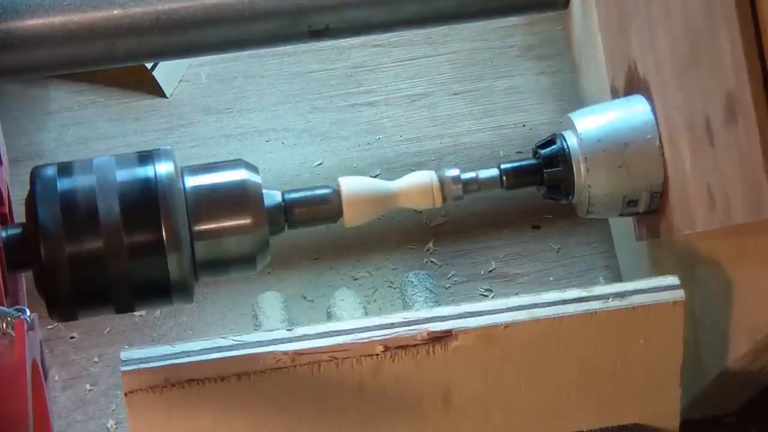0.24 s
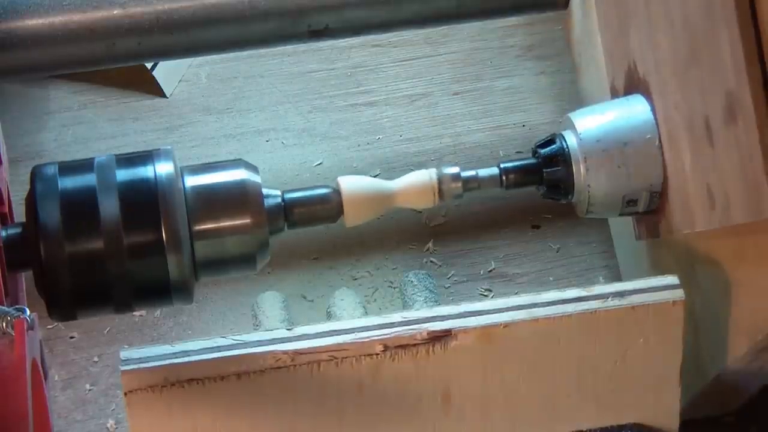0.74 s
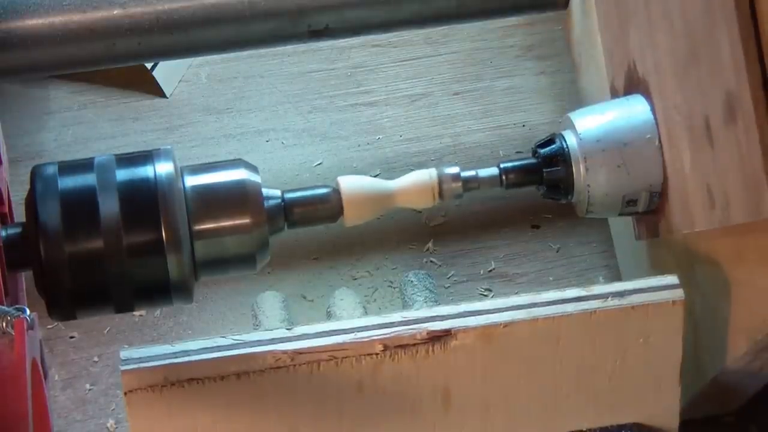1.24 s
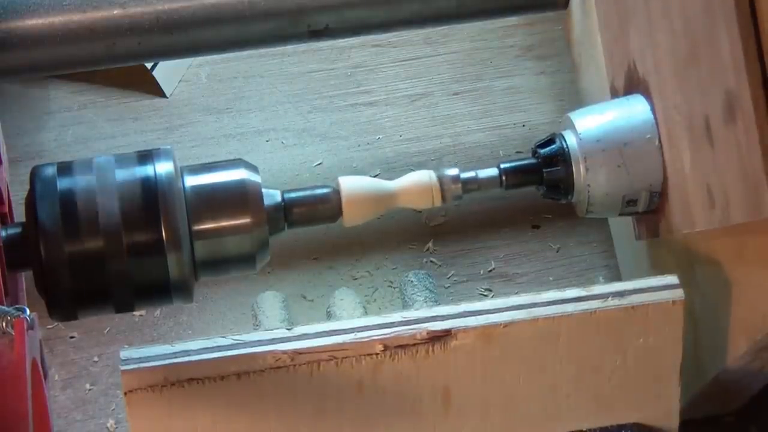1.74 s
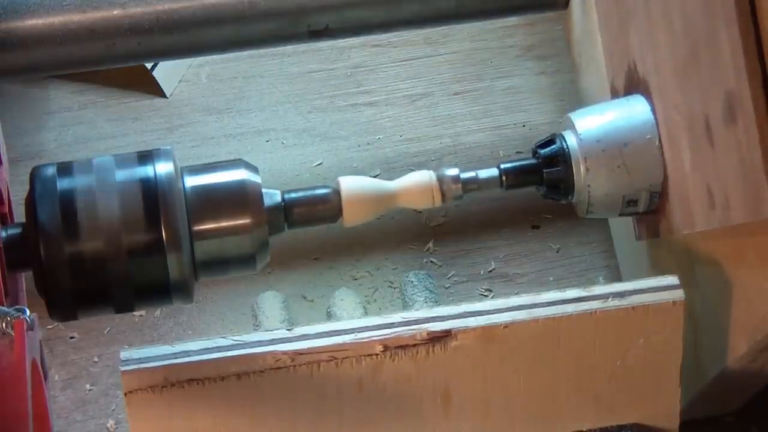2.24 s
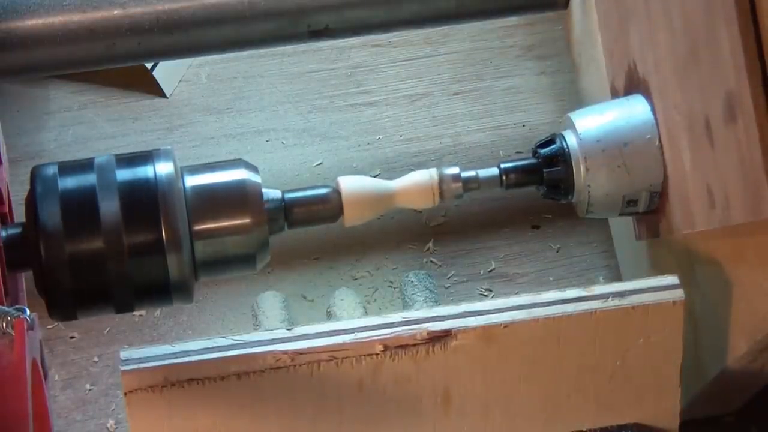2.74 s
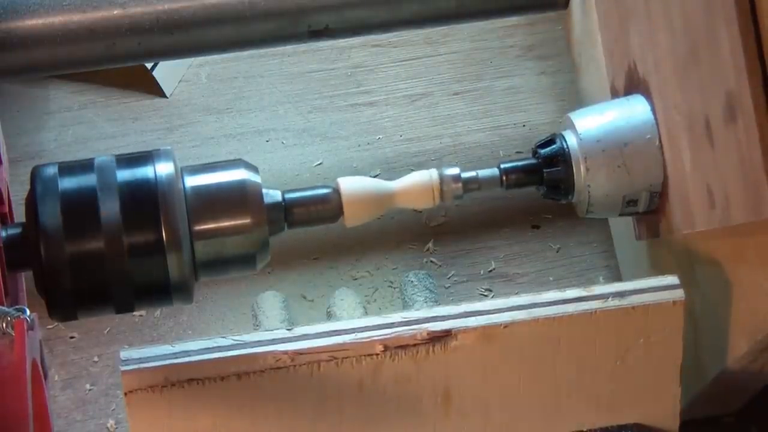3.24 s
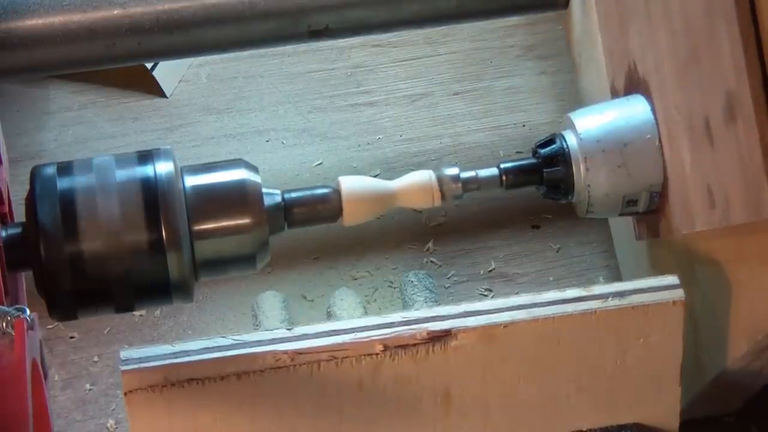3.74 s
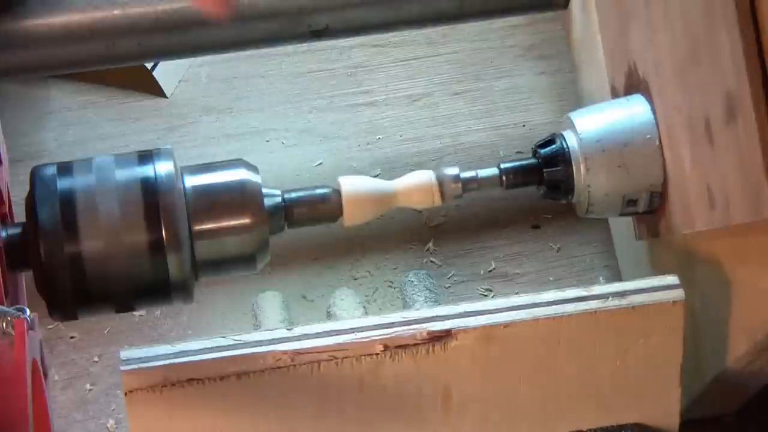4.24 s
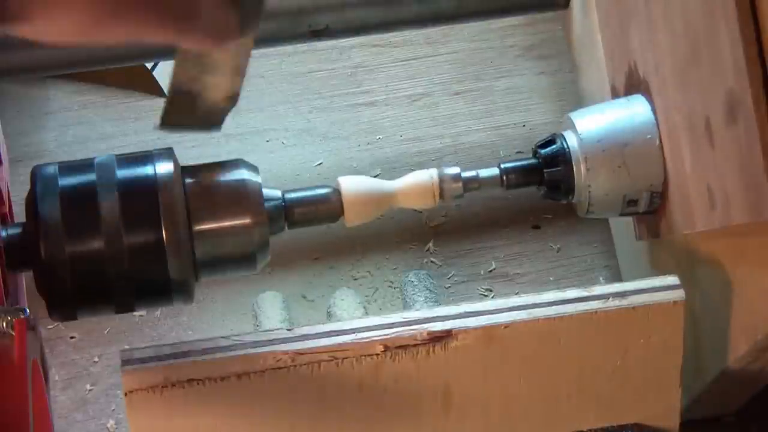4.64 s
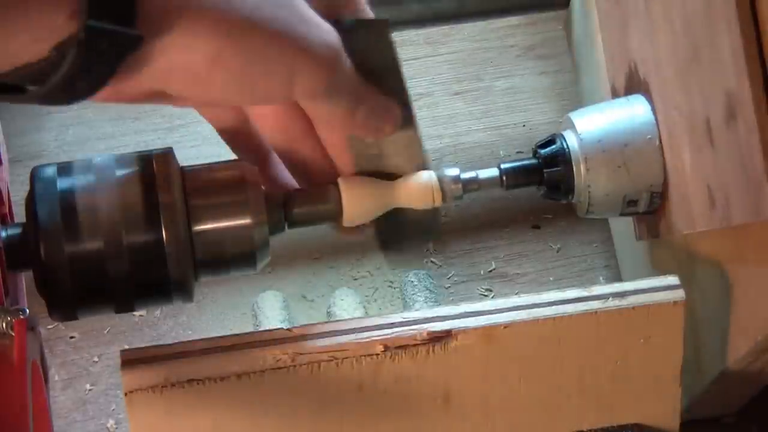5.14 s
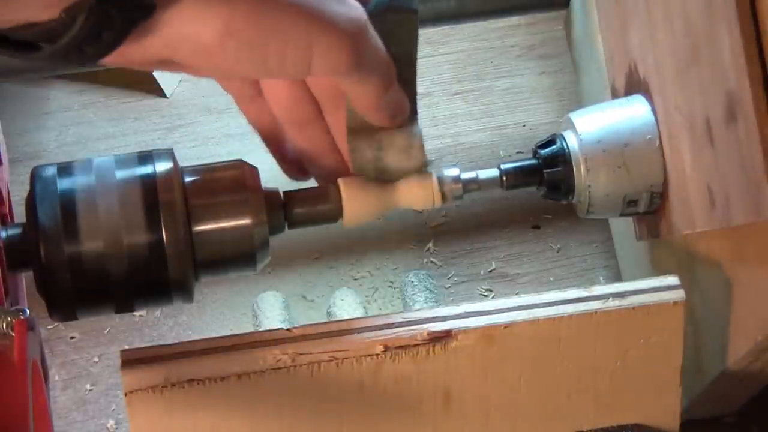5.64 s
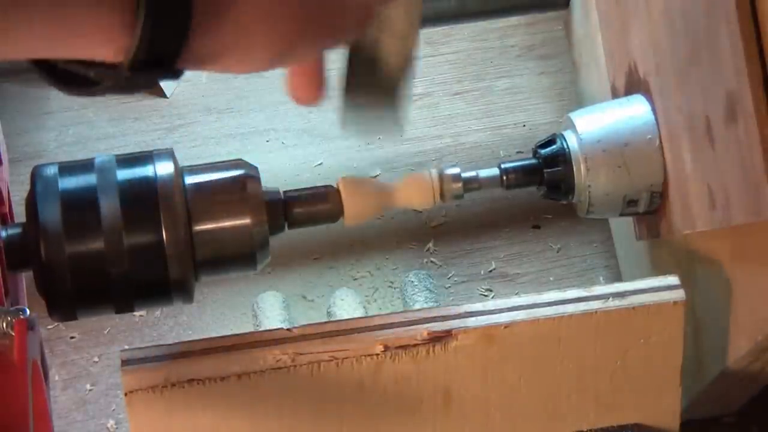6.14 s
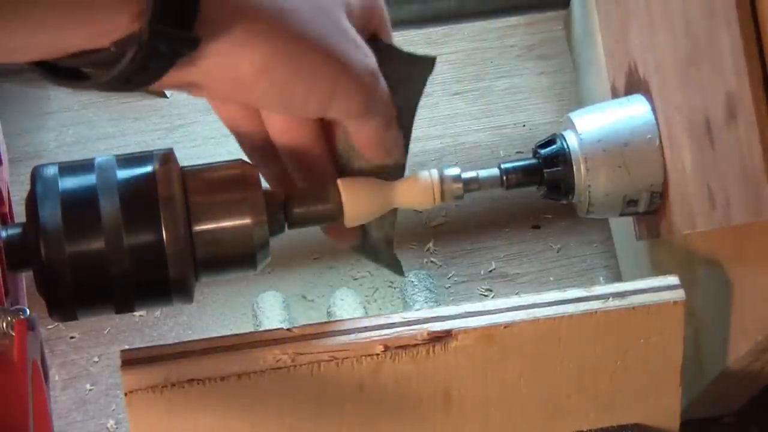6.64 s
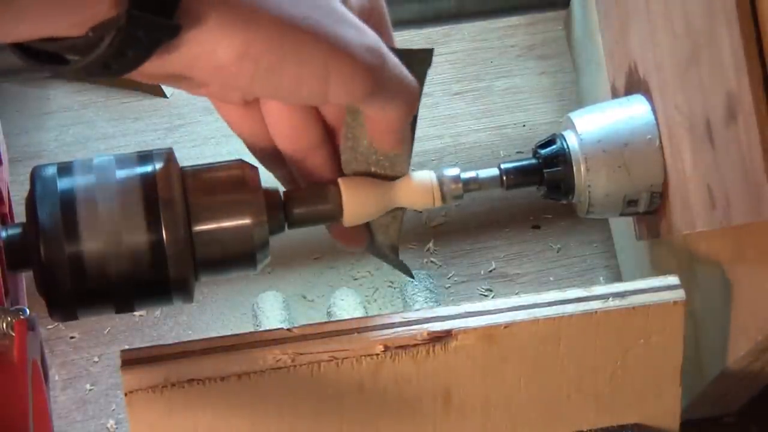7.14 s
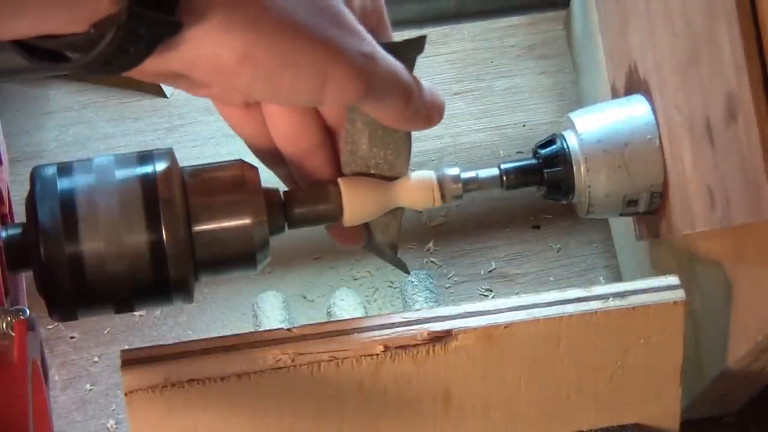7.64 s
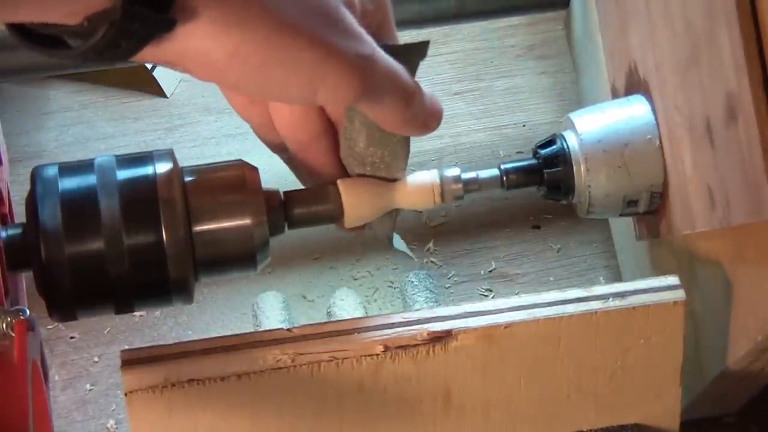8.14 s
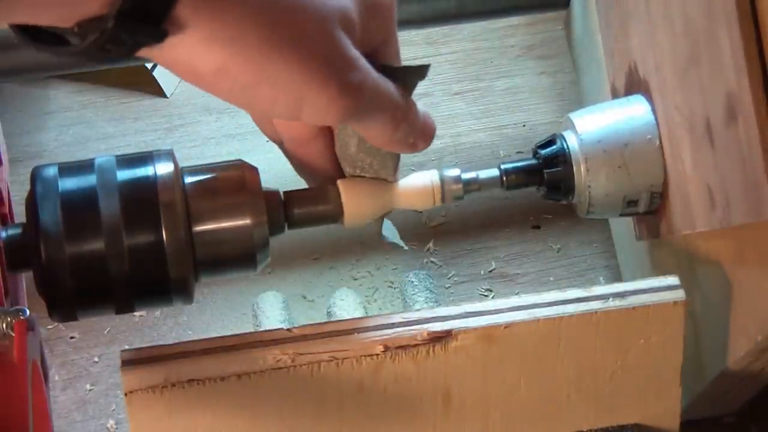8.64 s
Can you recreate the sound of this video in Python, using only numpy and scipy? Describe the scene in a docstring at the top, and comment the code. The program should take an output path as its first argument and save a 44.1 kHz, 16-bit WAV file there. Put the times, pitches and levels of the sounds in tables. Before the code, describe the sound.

A drill press is already running at 0 seconds, close ahead in a small shed: a strong low mains hum throbs rapidly with the motor shaft, over belt rumble, faint steady whines and a light bearing rattle with occasional tiny jolts. It continues throughout. Around 2.2 seconds stiff abrasive paper begins to slide and crinkle in the fingers, with small dry snaps near 2.8, 3.3, 3.6, 4.25 and 4.5. At about 5.4 the paper touches the spinning wooden dowel, giving a bright, rough hiss for roughly half a second, then lifts at 5.85. Faint paper rustles follow around 6.1 to 6.3. From 7.0 the paper is pressed on; a gritty high hiss swells and holds to the end near 8.9, fluttering with rotation. The drive grows quieter under load, especially around 8.5, when a thin papery ringing becomes stronger. Nearby boards add very short reflections.

```python
"""A drill press is already running in a shed, close ahead of the microphones: mains hum that throbs with the
motor shaft, a belt rumbling through the frame and a light rattle of bearings, made of tones and shaped noise.
A strip of abrasive paper then slides and crinkles in the fingers, as clumps of tiny ticks and ringing modes.
It touches the spinning wooden dowel once, then is pressed on: a rising hiss of grit, wavering with each turn,
lasts to the end while the load quiets the drive."""
import sys
import numpy as np
from scipy import signal
from scipy.fft import rfft, irfft
from scipy.io import wavfile

SR = 44100
rng = np.random.default_rng(int(sys.argv[2]) if len(sys.argv) > 2 else 0)


def wav_out(sig):
    """Save sig, one row per channel (or a flat mono array), as 16-bit PCM at SR to the path in sys.argv[1]."""
    wavfile.write(sys.argv[1], SR, np.round(np.clip(np.atleast_2d(sig).T, -1, 1) * 32767).astype(np.int16))


N = 392049
TIME, FREQ = np.arange(N) / SR, np.fft.rfftfreq(N, 1 / SR)  # s, Hz
HUM_HZ, SHAFT_HZ, BELT_HZ = 99.966, 24.82, 6.19  # hum, turns of the motor shaft, laps of the belt

# How alike the paper sounds at the left and right microphones. Each row: frequency in Hz, likeness (1 = same).
PAPER_LIKENESS = [(1000, .999), (4000, 1), (5000, 1), (5700, 0.65), (6500, 0.22), (7300, .7), (10500, 0.79)]


def amp(db):
    """Decibels to gain."""
    return 10 ** (np.asarray(db) / 20)


def unit(x):
    """Scales to an rms of 1."""
    return x / np.sqrt(np.mean(x ** 2) + 1e-20)


def read(points):
    """Reads a table of (Hz, value) along a log-frequency axis."""
    hz, value = np.transpose(points)
    return np.interp(np.log(FREQ + 1), np.log(hz + 1), value)


def over_time(points):
    """Reads a table of (s, value) along the scene in straight lines."""
    return np.interp(TIME, *np.transpose(points))


def lowpass(x, hz):
    """Smoothly removes what lies above hz."""
    return irfft(rfft(x) / (1 + (FREQ / hz) ** 4), N)


def wander(hz):
    """Slow chance of rms 1, up to about hz changes a second."""
    return unit(lowpass(rng.standard_normal(N), hz))


def turning(hz):
    """Angle of something that turns steadily, from a chance start."""
    return 2 * np.pi * (hz * TIME + rng.random())


def swells(rows):
    """Sum of smooth swells, each (middle s, height, half length s)."""
    return sum(height * np.exp(-((TIME - s) / length) ** 2) for s, height, length in rows)


def grit(per_s, spread_db, share):
    """Separate ticks of uneven size over a smooth wash of countless small ones; share is the ticks' power."""
    size_db = spread_db * np.minimum(rng.exponential(1, N), 4)
    size = amp(size_db) * (rng.random(N) < per_s / SR)
    ticks = unit(size * rng.standard_normal((2, N)))
    wash = rng.standard_normal((2, N))
    share = np.clip(share, 0, 1)
    return np.sqrt(share) * ticks + np.sqrt(1 - share) * wash


def repeating(hz, share, fresh):
    """Mixes fresh chance with a pattern that comes round hz times a second; share is the pattern's power."""
    lap = rng.standard_normal((2, round(SR / hz)))
    pattern = lap[:, np.arange(N) % lap.shape[1]]
    share = np.clip(share, 0, 1)
    return np.sqrt(share) * pattern + np.sqrt(1 - share) * fresh


def colour(pair, gain, same):
    """Filters two unrelated signals into a left and right of the given likeness, their middle at rms 1."""
    likeness = np.clip(read(same), -1, 1)
    mid, side = rfft(pair) * gain * np.sqrt([1 + likeness, 1 - likeness])
    mid, side = irfft(mid, N), irfft(side, N)
    return np.array([mid + side, mid - side]) / np.std(mid)


def load_swing():
    """Swing of the drive's level in dB, as the hum swells and sinks with the load on the motor."""
    # Each row: time in seconds, swing in dB.
    swing = [(0, .2), (2.2, -1.8), (2.85, .6), (6.85, 0), (7.12, 2.0), (7.85, -.3), (8.0, -2.2),
             (8.52, -4.5), (8.89, -2.0)]
    return over_time(swing)


def motor():
    """The stator hums at twice the mains; the off-centre rotor adds sidebands that throb once a turn."""
    # Harmonics of the magnetic hum, lowest first. Each row: level in dB, sideband one shaft rate below in dB,
    # sideband above in dB, share of the load swing it follows.
    harmonics = [(-17, -57, -53, .45), (-17.5, -53, -58, 0.88), (-26.5, -50, -49, 1.7),
                 (-30.5, -44, -47, 1.1), (-17, -26, -35.5, 0.63), (-31.5, -40, -60, .3),
                 (-41, -55, -53, .3), (-40, -57, -57, .3), (-44, -47, -51, .3)]
    # Steady tones of pulleys, rotor slots and bearings. Each row: frequency in Hz, level in dB.
    whine_tones = [(54.1, -50), (127, -41), (181.2, -36.5), (254.1, -38), (327, -37), (354, -34.5),
                   (367.6, -46), (744.5, -50.5), (819.7, -38), (1144.4, -42.5), (1169, -48), (1244.3, -50),
                   (1271, -46), (1444.3, -48), (3391, -59), (4387, -61)]
    drift, jitter = 0.15, 0.022  # radians rms: shaft angle, hum phase
    belt_tug, waver = 0.067, 0.011  # depths of level change
    whine_feel = 0.61  # share of the load swing
    swing_db = load_swing()
    mains, belt = turning(HUM_HZ), turning(BELT_HZ)
    shaft = turning(SHAFT_HZ) + drift * wander(1.7)
    hum = np.zeros(N)
    for k, (db, below_db, above_db, feel) in enumerate(harmonics, 1):
        # bending waves disperse in the frame, which spreads each pulse out in time
        angle = k * mains - .58 * k * (k - 1) + jitter * wander(3.7)
        tone = amp(db) * np.cos(angle)
        tone = tone + amp(below_db) * np.cos(angle - shaft) + amp(above_db) * np.cos(angle + shaft)
        # the belt tugs once a lap, most on the higher harmonics
        unevenness = 1 + belt_tug * np.log(k) * np.cos(belt) + waver * wander(3.4)
        hum += tone * amp(feel * swing_db) * unevenness
    whine = np.zeros(N)
    for hz, db in whine_tones:
        tone = np.cos(turning(hz) + 0.29 * wander(2.1))
        whine += amp(db) * tone * (1 + 0.26 * wander(5))
    return np.sqrt(2) * (hum + amp(whine_feel * swing_db) * whine)  # levels are rms


def drive():
    """Belt and bearings shake the frame; the belt's bumps return on every lap, the bearings' on every turn."""
    # Spectra of belt and bearings before the frame. Each row: frequency in Hz, relative level in dB per Hz.
    rumble_colour = [(15, -22), (40, -14), (65, -15), (90, -8), (160, -11.5), (240, -9.5), (285, -3),
                     (370, -1), (420, -4.5), (510, -6.5), (545, -9.5), (750, -15.5), (1200, -33),
                     (3000, -65)]
    rattle_colour = [(200, -20), (560, -6), (750, 0.5), (1200, -3), (1500, -6.5), (1750, -8.5),
                     (2000, -11.5), (2700, -14), (3600, -19.5), (5000, -23.5), (7000, -28), (11000, -33)]
    # Resonances of the frame and belt guard. Each row: centre in Hz, width in Hz, lift (or dip) in dB.
    resonances = [(190, 20, 10.5), (265, 16, 4), (488, 29, 10), (616, 35, 6), (1120, 21, -3),
                  (1128, 41, 3.5), (2807, 120, 5), (2904, 100, -6.5), (3054, 73, 7), (4410, 94, 0),
                  (7300, 120, 4), (8430, 110, 6.5)]
    # Brief jolts in which the machine rattles harder. Each row: middle in seconds, lift in dB,
    # half length in seconds.
    jolts = [(.32, 2.5, .022), (.55, 2.5, .02), (2.838, 4.5, 0.028), (3.292, 5.5, 0.022),
             (3.57, 4.5, 0.015), (3.926, 5, .03), (5.573, 4, 0.018), (5.85, 3, .07), (6.005, 4, 0.02),
             (7.925, 3.5, 0.022), (8.155, 5.5, 0.018), (8.304, 4.5, .022), (8.67, 3.5, 0.03)]
    # Likeness of the drive at the two microphones. Each row: frequency in Hz, likeness (1 = same).
    drive_likeness = [(25, .94), (70, 1), (200, 1), (1000, .9998), (2000, 1), (4400, 1), (5200, .8),
                      (8000, 0.42), (11000, 0.71)]
    rumble_db, rattle_db = -20.1, -25.9  # before load, drift and jolts
    buzz, knock = 0.087, 0.061  # depths of chatter at the hum and shaft rates
    unsteady_db, clatter_db, clatter_hz = 0.9, 1.25, 1800
    # both follow the load a little and drift by chance
    swing_db = load_swing()
    rumble_gain = amp(rumble_db + .6 * swing_db + .3 * wander(2.5))
    rattle_gain = amp(rattle_db + .45 * swing_db + .15 * wander(2.5) + swells(jolts))
    frame = amp(sum(db / (1 + (2 * (FREQ - hz) / width) ** 2) for hz, width, db in resonances))
    belt = repeating(BELT_HZ, .22, rng.standard_normal((2, N))) * amp(1.6 * wander(15))
    # loose parts chatter at the rates of the hum and the shaft
    chatter = repeating(SHAFT_HZ, .16, grit(900, 1.6, 0.16)) * amp(unsteady_db * wander(18.5))
    chatter = chatter * (1 + buzz * np.cos(turning(HUM_HZ)) + knock * np.cos(turning(SHAFT_HZ)))
    # the heavier parts clatter in short bursts
    heavy = lowpass(chatter, clatter_hz)
    chatter = chatter + heavy * (amp(clatter_db * wander(10.5)) - 1)
    rumble = rumble_gain * colour(belt, frame * amp(read(rumble_colour)), drive_likeness)
    rattle = rattle_gain * colour(chatter, frame * amp(read(rattle_colour)), drive_likeness)
    return rumble + rattle


def ringing():
    """Grains drive the bending modes of the paper strip."""
    # Modes of the held paper. Each row: centre in Hz, width in Hz, relative level in dB.
    strip_modes = [(4990, 170, -4), (5330, 430, -9.5), (5700, 140, 2), (6080, 230, -2), (6650, 400, -6.5)]
    power = sum(amp(db) ** 2 / (1 + 2 * ((FREQ - hz) / width) ** 2) ** 2 for hz, width, db in strip_modes)
    return colour(grit(5000, 3., 0.32), np.sqrt(power), PAPER_LIKENESS)


def handling():
    """The paper slides and buckles in clumps of tiny snaps, each buckle also setting the strip ringing."""
    # The paper slides in the fingers. Each row: middle in seconds, level in dB, half length in seconds.
    slides = [(2.23, -42, .16), (2.82, -34.5, .07), (3.31, -38, .035), (3.58, -39.3, .13),
              (3.94, -42.5, .12), (4.265, -35, .045), (4.42, -37.5, .028), (4.58, -43.5, .09),
              (4.84, -34.5, .022), (6.09, -43, .14), (6.265, -37, .055)]
    # The stiff paper buckles or bites. Each row: peak in seconds, crackle level in dB,
    # level of the ringing strip in dB, decay in seconds.
    crinkles = [(2.215, -34, -33, .012), (2.34, -41, -35, .014), (2.824, -43, -46, .015),
                (3.117, -36, -41, 0.0134), (3.294, -29, -40, .014), (3.579, -28, -35, .013),
                (3.649, -37, -48, .015), (4.035, -36, -50, .02), (4.251, -35, -37, .024),
                (4.523, -41, -50, 0.016), (4.605, -42, -50, .012), (5.396, -32, -28.5, 0.045),
                (5.823, -31, -38, .012)]
    # Spectrum of the handled paper. Each row: frequency in Hz, relative level in dB per Hz.
    paper_colour = [(400, -13.5), (1400, -10), (2800, 3), (4500, 6), (6000, 1), (7500, -1), (11000, -5.5)]
    clump_db, rise_s = 1.5, 0.0024
    sliding = swells((s, amp(db), length) for s, db, length in slides)
    force = amp(clump_db * wander(40)) * sliding
    ring = np.zeros(N)
    for s, db, ring_db, decay in crinkles:
        snap = np.exp(-np.maximum((s - TIME) / rise_s, (TIME - s) / decay))
        force = force + amp(db) * snap
        ring = ring + amp(ring_db) * snap
    crackle = colour(grit(1500, 3.3, 0.26), amp(read(paper_colour)), PAPER_LIKENESS)
    return force * crackle + ring * ringing()


def stroke(start, end, db, settle):
    """Gain of paper on wood: it bites quickly, grows as the paper beds in, holds, and dies away after its end."""
    bite_s, settle_db, release_db_per_s = .022, 12, 125
    age = np.maximum(TIME - start, 0)
    bedding_db = -settle_db * np.exp(-age / settle)
    release_db = -release_db_per_s * np.maximum(TIME - end, 0)
    return np.minimum(age / bite_s, 1) * amp(db + bedding_db + release_db)


def sanding():
    """Grit scrapes the wood; the slightly out-of-round dowel varies the contact on every turn."""
    # The paper brushes the dowel loosely, then is pressed on past the end of the scene.
    # Each holds: start in seconds, end in seconds, level in dB, time to settle in seconds.
    touch_stroke = (5.372, 5.84, -20.3, .075)
    press_stroke = (7.012, 8.95, -21.5, .21)
    # Spectra of the loose touch and the press. Each row: frequency in Hz, relative level in dB per Hz.
    touch_colour = [(700, -17), (2000, -5.5), (3300, -3.5), (4500, -1), (6500, 1), (7500, -2), (8200, 1),
                    (9000, -2), (10000, 3.3), (11000, 3)]
    press_colour = [(900, -28.5), (2500, -13), (4000, -6.5), (6800, -5), (7800, -6), (9300, -5.5),
                    (9900, 0), (10400, 2.5), (10800, 2.3)]
    # How hard the thumb bears on the strip. Each row: time in seconds, pressure in dB.
    thumb = [(7.3, -.3), (7.75, 1.3), (8.03, -2), (8.3, -2), (8.55, 1.2), (8.89, -.7)]
    spindle_hz = 27.05
    wobble, lobes = 0.049, .07  # depths once and three times a turn
    flutter_db, ring_waver_db = 1., 1.5
    ring_db, ring_settle_s = -38.3, .055  # the pressed strip starts to ring almost at once
    taut_s, taut_rise_s, taut_db = 8.54, .03, 6.5  # and rings louder once it is drawn taut
    angle = turning(spindle_hz)
    roundness = 1 + wobble * np.cos(angle) + lobes * np.cos(3 * angle)
    contact = roundness * amp(flutter_db * wander(30))
    brushing = colour(grit(4000, 2.24, 0.25), amp(read(touch_colour)), PAPER_LIKENESS)
    touch = stroke(*touch_stroke) * brushing
    pressure = amp(over_time(thumb))
    scraping = colour(grit(5000, 5.0, 0.26), amp(read(press_colour)), PAPER_LIKENESS)
    hiss = pressure * stroke(*press_stroke) * scraping
    taut = (1 + np.tanh((TIME - taut_s) / taut_rise_s)) / 2
    ring_gain = stroke(*press_stroke[:2], ring_db, ring_settle_s)
    ring = ring_gain * amp(taut_db * taut + ring_waver_db * wander(7)) * ringing()
    return contact * (touch + hiss + ring)


def boards(x):
    """The table, fence and backboard close by throw back a few quick echoes."""
    echo_db, count = -9.5, 8  # all echoes together, against the direct sound
    delays = rng.uniform(0.00096, .009, count)  # s
    signs = rng.choice([-1, 1], count)
    echoes = np.zeros((2, N))
    for sign, delay in zip(signs, delays):
        late = np.pad(x, ((0, 0), (round(delay * SR), 0)))[:, :N]
        echoes += sign * late / np.sqrt(count)
    return (x + amp(echo_db) * echoes) / np.hypot(1, amp(echo_db))


def placed(x, left_db, lead=0):
    """Leans a sound to the left, in level and in phase, half on each side."""
    half = np.array([[1], [-1]]) / 2
    return irfft(rfft(x) * np.exp(1j * half * lead), N) * amp(half * left_db)


def scene():
    """The machine ahead of the microphones, the paper close to the centre among the boards."""
    # Balance of the hum as the arm reaches in. Each row: time in seconds, left minus right in dB.
    lean = [(0, 1.7), (1.5, 0.65), (4.5, .3), (6, 0), (7.3, -0.8), (8.89, 0)]
    # Phase of the machine between the ears. Each row: frequency in Hz, radians by which the left leads.
    ear_lead = [(30, .1), (70, .25), (100, 0.23), (200, 0.13), (320, .02), (420, 0.078), (500, 0.18),
                (640, .01), (1000, 0)]
    hum = placed(motor(), left_db=over_time(lean), lead=read(ear_lead))
    shaking = placed(drive(), left_db=-0.42, lead=read(ear_lead))
    paper = placed(boards(handling() + sanding()), left_db=.5)
    return hum + shaking + paper


def record(dry):
    """The recorder rounds off the highest peaks, starts and stops softly, then cuts the treble steeply."""
    knee, headroom = .72, .22  # of full scale
    fade_s, edge_hz = .002, 10880
    over = np.maximum(abs(dry) - knee, 0)
    rounded = dry - np.sign(dry) * (over - headroom * np.tanh(over / headroom))
    rounded = rounded * np.minimum(np.minimum(TIME, TIME[::-1]) / fade_s, 1)
    band_limit = signal.firwin(2047, edge_hz, window=("kaiser", 9), fs=SR)
    return signal.oaconvolve(rounded, band_limit[None], "same")


dry = scene()
out = record(dry)
wav_out(out)
```